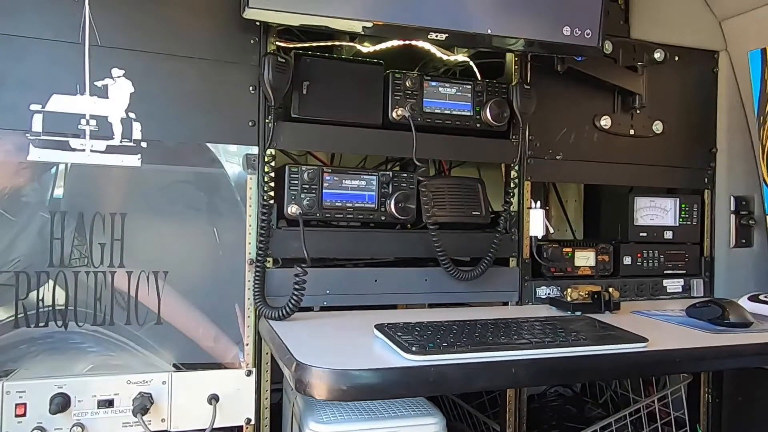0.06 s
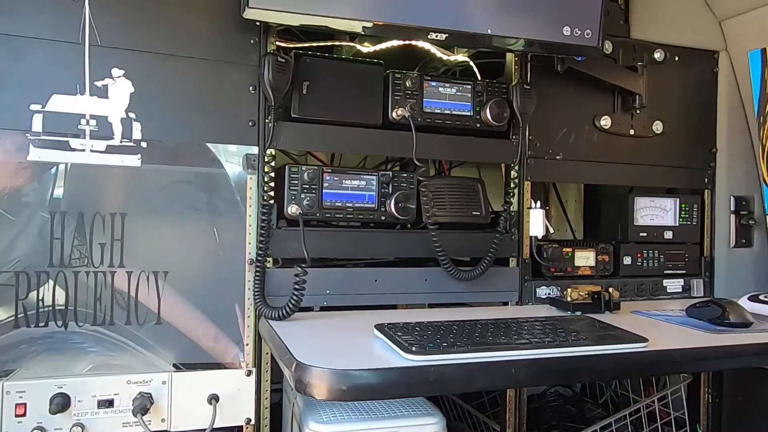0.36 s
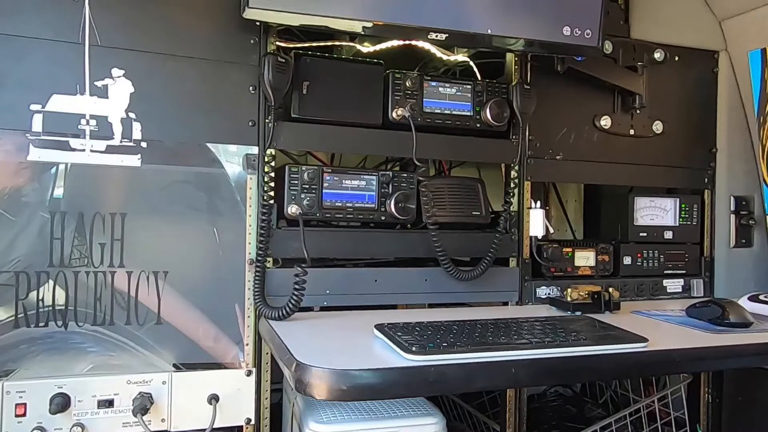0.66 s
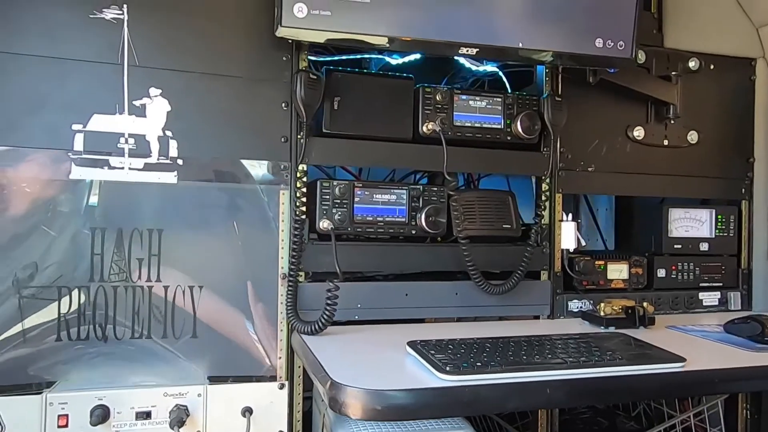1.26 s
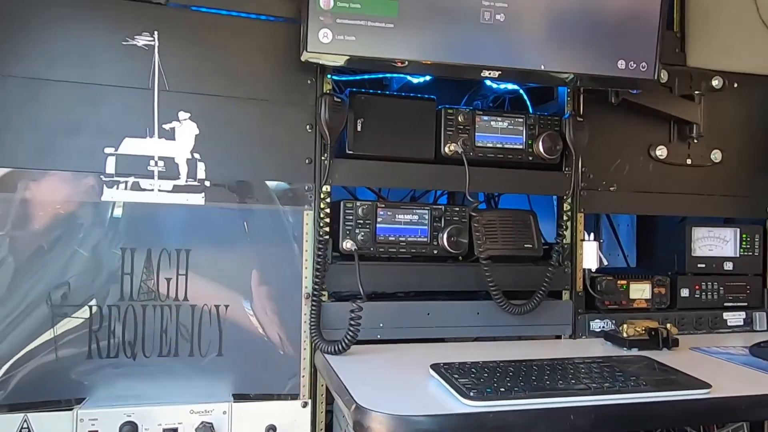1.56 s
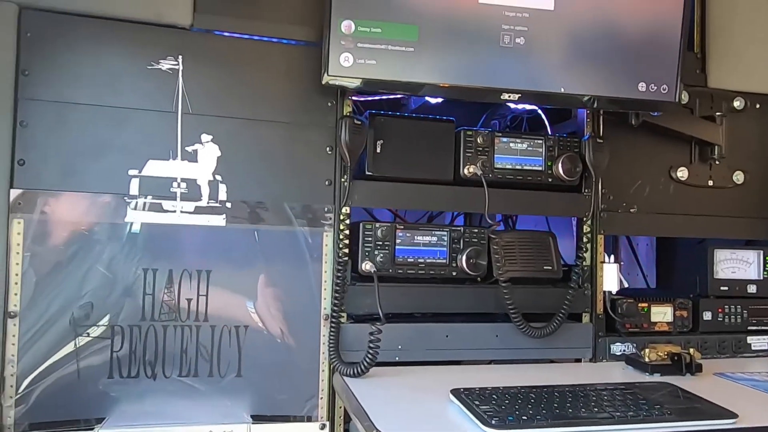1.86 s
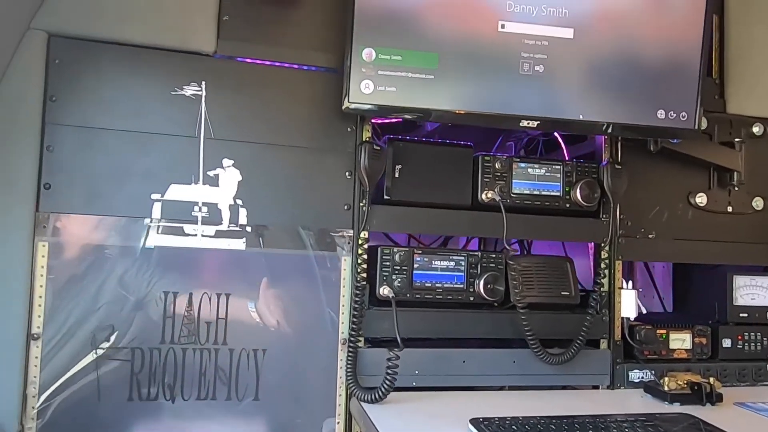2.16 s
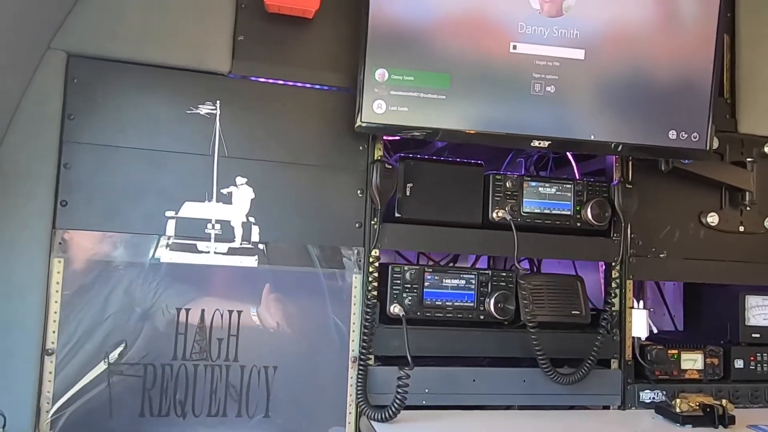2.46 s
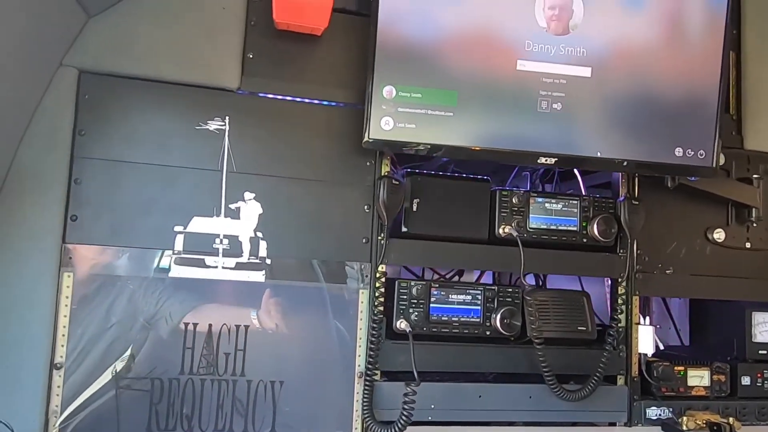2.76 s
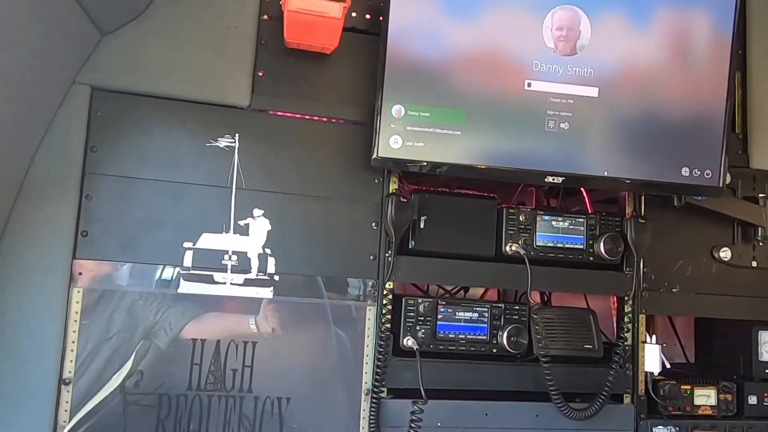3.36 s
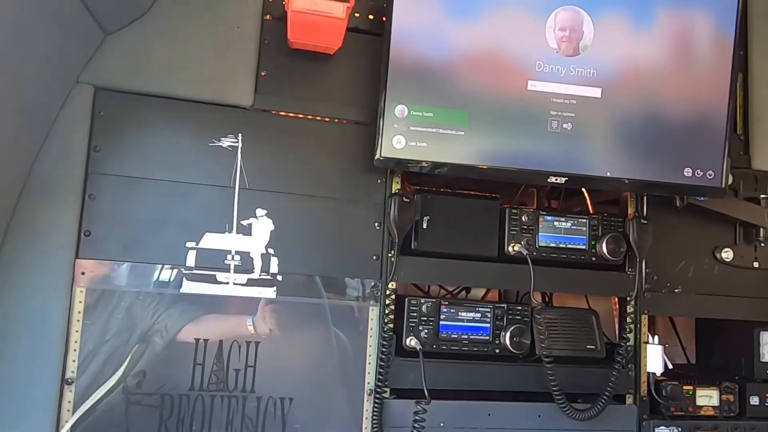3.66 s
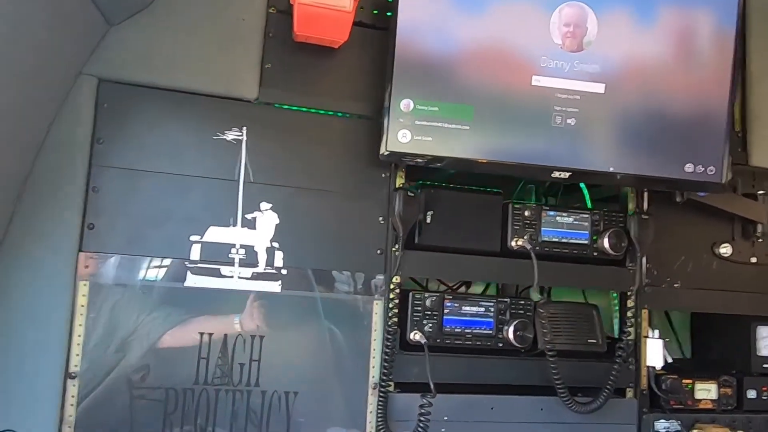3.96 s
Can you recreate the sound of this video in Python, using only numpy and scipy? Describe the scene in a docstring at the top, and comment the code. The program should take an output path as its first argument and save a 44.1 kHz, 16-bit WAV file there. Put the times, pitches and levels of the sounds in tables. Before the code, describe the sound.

Machinery drones steadily inside a small equipment van, mixed with electrical hum, rushing fan air and faint whistles. A fast, light mechanical ticking soon comes forward and stays, while the hiss shifts slightly with the moving microphone.

```python
"""A steady drone and rushing fans inside an equipment van. Two machines and the mains hum;
the slower machine ticks twice a turn, faintly at first. The cooling fans rumble, rush and hiss,
with faint narrow whistles. The microphone drifts through the small cabin, so the ticks and
the colour of the air change slowly."""
import sys
import numpy as np
from scipy import signal
from scipy.fft import rfft, irfft, next_fast_len
from scipy.io import wavfile
from scipy.ndimage import uniform_filter1d, map_coordinates

SR = 44100
rng = np.random.default_rng(int(sys.argv[2]) if len(sys.argv) > 2 else 0)


def digitize_waveform(pressure):
    """Quantize a signal to 16-bit integers and store it at the path in sys.argv[1].

    Rows of a 2-D input are taken as channels; values are limited to [-1, 1].
    """
    field = np.atleast_2d(pressure).T
    bounded = np.clip(field, -1, 1)
    quanta = np.round(bounded * 32767).astype(np.int16)
    wavfile.write(sys.argv[1], SR, quanta)


N = 176400
T = np.arange(N) / SR


def amp(db):
    """Decibels to gain."""
    return 10 ** (np.asarray(db) / 20)


def unit(x):
    """Scale to rms 1."""
    return x / np.sqrt(np.mean(x ** 2) + 1e-20)


def gain_at(points, hz):
    """Gain from (freq_hz, gain_db) points on a log frequency axis."""
    freq_hz, gain_db = np.transpose(points)
    return amp(np.interp(np.log(hz + 1), np.log(freq_hz + 1), gain_db))


def curve(points):
    """(time_s, value) points to one value per sample."""
    return np.interp(T, *np.transpose(points))


def wobble(knots_per_s):
    """Smooth random curve."""
    return map_coordinates(rng.standard_normal(256), [T * knots_per_s], mode="wrap")


def panned(x, left_db):
    """Mono to stereo; left_db is left minus right."""
    return x * amp([[left_db / 2], [-left_db / 2]])


def minimum_phase(colour, size=2048):
    """Most compact impulse response with this colour."""
    cepstrum = irfft(np.log(gain_at(colour, np.fft.rfftfreq(size, 1 / SR))))
    cepstrum[1:size // 2] *= 2
    cepstrum[size // 2 + 1:] = 0
    return irfft(np.exp(rfft(cepstrum)))


def hum(turns, partials, waver_db):
    """Partials locked to a rotation, each wavering in level."""
    total = np.zeros(N)
    for order, level_db in partials:
        peak = np.sqrt(2) * amp(level_db + waver_db * wobble(4.975))
        total += peak * np.sin(2 * np.pi * (order * turns + rng.random()))
    return total


def slow_machine(turns):
    """Hum of the ticking machine at multiples of its turn rate."""
    partials = [(1, -43), (2, -45), (3, -30), (4, -37.5), (6, -37)]  # order, level_db
    return panned(hum(turns, partials, waver_db=-0.5), left_db=-0.2)


def fast_machine(turn_hz=29.56):
    """Slowly swelling drone at multiples of the turn rate."""
    partials = [(1, -26.3), (2, -34), (6, -39)]  # order, level_db
    swell = [(0, -7), (.5, 1.5), (1.1, 1), (1.45, 0.5), (2.1, 2), (2.48, -3.5), (2.95, 3.5), (3.45, -2.5),
             (4, -0.5)]  # time_s, gain_db
    return panned(amp(curve(swell)) * hum(turn_hz * T, partials, waver_db=-1.5), left_db=-1.4)


def mains(line_hz=60.06):
    """Slowly swelling hum at twice the line frequency."""
    partials = [(2, -27.5)]  # order, level_db
    swell = [(0, 1.5), (.4, 1.5), (.6, 3.5), (.85, -2.5), (1.1, -0.5), (1.8, -0.5), (2.1, 3.5),
             (2.43, -0.5), (2.9, -1), (3.15, 3), (3.5, 1), (4, 2)]  # time_s, gain_db
    return panned(amp(curve(swell)) * hum(line_hz * T, partials, waver_db=0.7), left_db=-0.2)


def tick_train(turns, at_turn, strength, jitter_s=.0002, scatter_db=1):
    """One impulse a turn, uneven in force and timing."""
    accents = [(.18, 4), (.59, 3.5), (.68, 3.5), (.8, 3), (.99, 3), (1.07, 4.5), (1.2, 4), (1.28, 2.5),
               (1.49, 2.5), (1.65, 3.5), (1.82, 3), (1.94, 2.5), (2.11, 3), (2.19, 3.5), (2.65, 3),
               (2.81, 2), (2.94, 2.5), (3.1, 2.5), (3.31, 3.5), (3.52, 2), (3.68, 3.5), (3.85, 2.5)]  # hardest ticks: time_s, boost_db
    starts = np.flatnonzero(np.diff(np.floor(turns - at_turn)))
    force, late = rng.standard_normal((len(starts), 2)).T
    accent_db = sum(db * (abs(starts / SR - time_s) < .008) for time_s, db in accents)
    force_db = curve(strength)[starts] + accent_db + scatter_db * np.clip(force, -2, 1)
    jittered = starts + np.round(late * jitter_s * SR).astype(int)
    blows = np.zeros(N)
    blows[np.clip(jittered, 0, N - 1)] = amp(force_db)
    return blows


def cabin_ticks(blows, t60_s=.06, tail_db=-2):
    """Each blow as a tick, with wall reflections and the cabin's short tail."""
    colour = [(200, -15), (800, -1), (1300, 3.5), (1800, 9.5), (2400, 7), (2750, 0.5), (3100, -18),
              (12000, -41)]  # tick spectrum: freq_hz, gain_db
    walls = [(.00184, -10.5), (.0043, -13)]  # reflections: delay_s, gain_db
    tick = minimum_phase(colour)
    direct = signal.fftconvolve(blows, tick)[:N]
    early = sum(amp(db) * np.interp(T - delay_s, T, direct) for delay_s, db in walls)
    decay = amp(-60 * T[:SR // 4] / t60_s)
    envelope = signal.fftconvolve(blows, decay / np.linalg.norm(decay))[:N]
    tail = signal.fftconvolve(envelope * rng.standard_normal((2, N)), tick[None], axes=1)[:, :N]
    return direct + early + amp(tail_db) * tail


def ticking(turns):
    """The slow machine's two ticks a turn, changing in strength as the microphone drifts."""
    main = [(0, -35), (.6, -27), (.8, -12), (3, -10.5), (4, -10.5)]  # time_s, strength_db
    second = [(0, -20), (.5, -13), (1.1, -15), (2.2, -19), (4, -15)]  # time_s, strength_db
    return (cabin_ticks(tick_train(turns, at_turn=.856, strength=main))
            + cabin_ticks(tick_train(turns, at_turn=.345, strength=second)))


def air(response, ripple_db, size=2048, ripple_fade_hz=11000, max_boost_db=7.5):
    """Stereo noise of rms 1; cabin reflections put drifting ripples in its spectrum."""
    spread = [(50, -20), (125, -21.5), (200, -46), (300, -13.5), (600, -10.5), (1200, -4), (2200, -20),
              (4000, -9.5), (5500, -2.5), (7500, 0), (12000, -0.5)]  # stereo width: freq_hz, side_over_mid_db
    balance = [(120, -1), (300, 2), (700, -0.5), (1500, -2.5), (2400, -1.5), (4500, -2), (5800, -5),
               (7300, -5), (8300, -0.5), (12000, -.3)]  # freq_hz, left_over_right_db
    hz, _, noise = signal.stft(rng.standard_normal((2, N)), SR, nperseg=size)
    hz = hz[:, None]
    width_rad = np.arctan(gain_at(spread, hz))
    mid, side = noise[0] * np.cos(width_rad), noise[1] * np.sin(width_rad)
    lean = np.sqrt(gain_at(balance, hz))
    stereo = np.array([(mid + side) * lean, (mid - side) / lean])
    ripple = uniform_filter1d(rng.standard_normal(noise.shape), size=3, axis=1)  # across frequency
    ripple = unit(uniform_filter1d(ripple, size=32, axis=2, mode="wrap"))  # across time
    depth_db = ripple_db / (1 + (hz / ripple_fade_hz) ** 4)
    # Reflections cut deep notches but add little.
    spectrum = stereo * response(hz) * amp(np.minimum(depth_db * ripple, max_boost_db))
    return unit(signal.istft(spectrum, nperseg=size)[1][:, :N])


def air_band(centre_hz, half_width_hz):
    """Air noise in one resonance."""
    return air(lambda hz: 1 / (1 + ((hz - centre_hz) / half_width_hz) ** 4), ripple_db=1.0, size=8192)


def fans(rumble_db=-27.5, surge_db=1, rush_db=-41.5):
    """Moving air: surging rumble, steady rush, flickering hiss."""
    rumble_shape = [(10, -35), (20, -18), (44, -20), (62, -9.5), (85, 2), (110, -0.5), (135, -4), (175, -7),
                    (215, -5.5), (245, -11.5), (285, -7.5), (330, -18.5), (365, -20.5), (430, -14),
                    (500, -22), (600, -21), (720, -32), (1000, -75)]  # freq_hz, gain_db
    rush_shape = [(380, -23), (650, 4), (723, 0.5), (960, 2.5), (1050, 1.5), (1130, 0.5), (1220, 2),
                  (1380, 2.5), (2190, -4), (2400, 0.5), (2950, -13), (3200, -21), (4160, -28), (7040, -120)]  # freq_hz, gain_db
    hiss_shape = [(1760, -31), (3000, -5.5), (3790, -4.5), (4000, -2), (4320, -2.5), (4990, -1),
                  (5650, -2.5), (7850, -5.5), (11400, -22), (15500, -28)]  # freq_hz, gain_db
    hiss_level = [(0, -40), (.2, -39.5), (3.3, -41), (4, -40.5)]  # time_s, level_db
    rumble_gain = amp(rumble_db + surge_db * wobble(5.72))
    rumble = rumble_gain * air(lambda hz: gain_at(rumble_shape, hz), ripple_db=0)
    rush = amp(rush_db) * air(lambda hz: gain_at(rush_shape, hz), ripple_db=4)
    hiss_gain = amp(curve(hiss_level) + 0.44 * wobble(14))
    hiss = hiss_gain * air(lambda hz: gain_at(hiss_shape, hz), ripple_db=5.3)
    return rumble + rush + hiss


def cabin_boom():
    """Cabin resonance just above the mains hum."""
    level = [(0, -41), (.2, -30.5), (.35, -39), (.7, -31.5), (1.1, -41.5), (2.2, -34), (2.45, -38),
             (2.8, -32.5), (4, -30)]  # time_s, level_db
    return amp(curve(level)) * air_band(centre_hz=172.5, half_width_hz=37)


def fan_whistles():
    """Wavering motor tones and steady narrow bands of air noise."""
    tones = [(887, -63), (1050, -59)]  # pitch_hz, level_db
    whistles = [(794.6, 7.5, -58), (1240, 20.5, -52.5), (1488, 14, -59), (1746, 22, -56), (2174, 26, -55.5)]  # centre_hz, half_width_hz, level_db
    motors = sum(hum(hz * T + 0.12 * wobble(7.6), [(1, db)], waver_db=2.4) for hz, db in tones)
    return motors + sum(amp(db) * air_band(hz, half_width_hz) for hz, half_width_hz, db in whistles)


def passing_resonances():
    """Air resonances that swell and fade as the microphone moves."""
    swells = [(.29, .16, 5080, 520, -44.5), (.75, .7, 5300, 800, -50.5), (1.45, 1.3, 4960, 130, -50),
              (.72, .11, 1380, 50, -52), (1.35, .45, 1975, 90, -48.5), (1.5, .55, 2230, 220, -50),
              (1.25, .22, 4700, 1200, -47.5), (2.28, .36, 4040, 80, -48.5), (3.3, 1, 2410, 110, -50.5)]  # peak_s, half_length_s, centre_hz, width_hz, level_db
    total = np.zeros((2, N))
    for peak_s, half_length_s, centre_hz, width_hz, level_db in swells:
        envelope = np.exp(-((T - peak_s) / half_length_s) ** 2)
        total += amp(level_db) * envelope * air_band(centre_hz, width_hz / 2)
    return total


def scene():
    """Machines, mains and fans in the cabin."""
    speed = [(0, 24.11), (1.2, 24.11), (2.2, 24.14), (4, 24.14)]  # slow machine: time_s, turn_hz
    turns = np.cumsum(curve(speed)) / SR
    machines = slow_machine(turns) + fast_machine() + mains() + ticking(turns)
    return machines + fans() + cabin_boom() + fan_whistles() + passing_resonances()


def record(dry, cutoff_hz=15700):
    """Brick-wall low-pass."""
    size = next_fast_len(N + SR // 2)
    passband = np.fft.rfftfreq(size, 1 / SR) < cutoff_hz
    return irfft(rfft(dry, size) * passband, size)[..., :N]


dry = scene()
out = record(dry)
digitize_waveform(out)
```